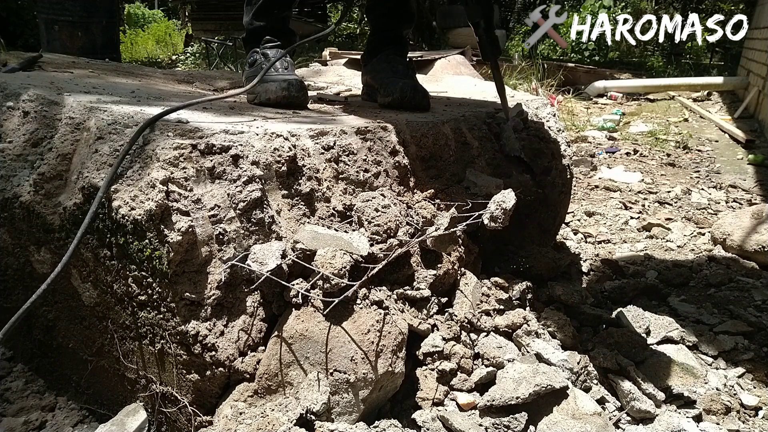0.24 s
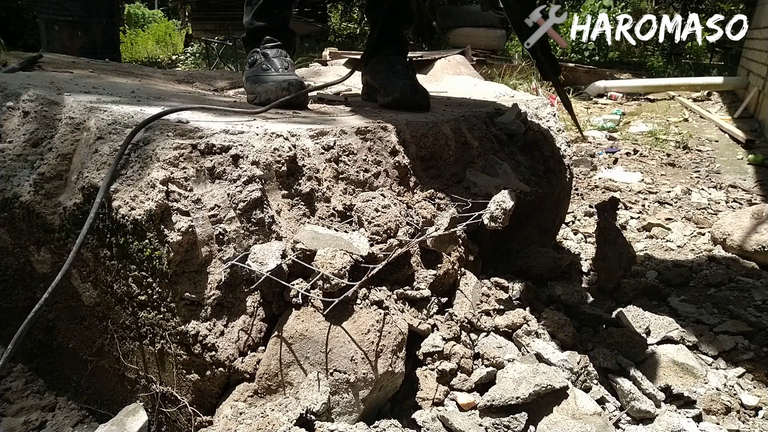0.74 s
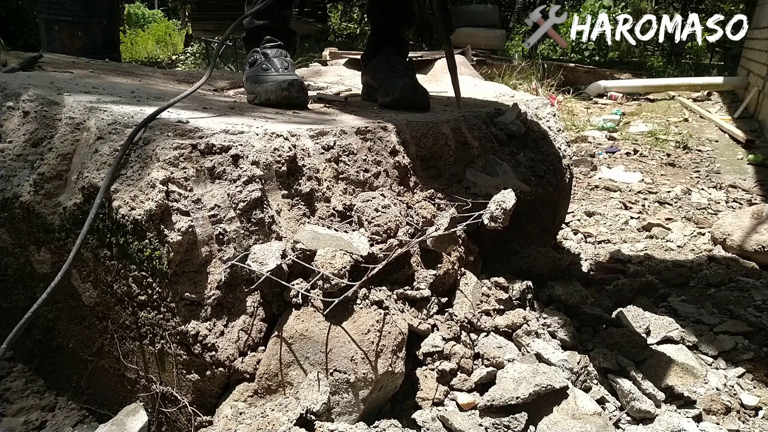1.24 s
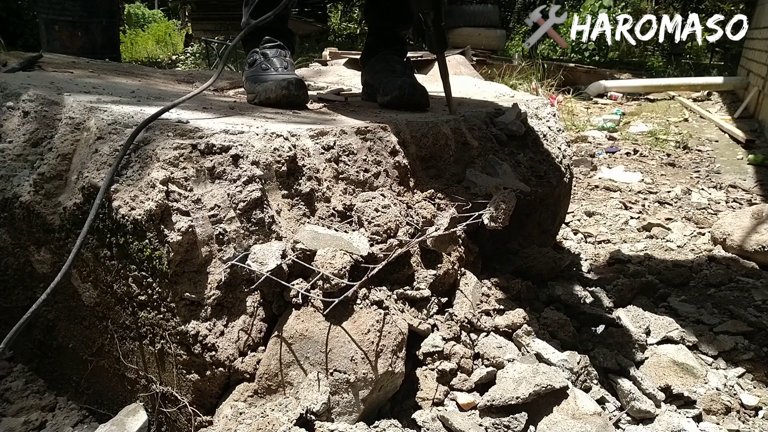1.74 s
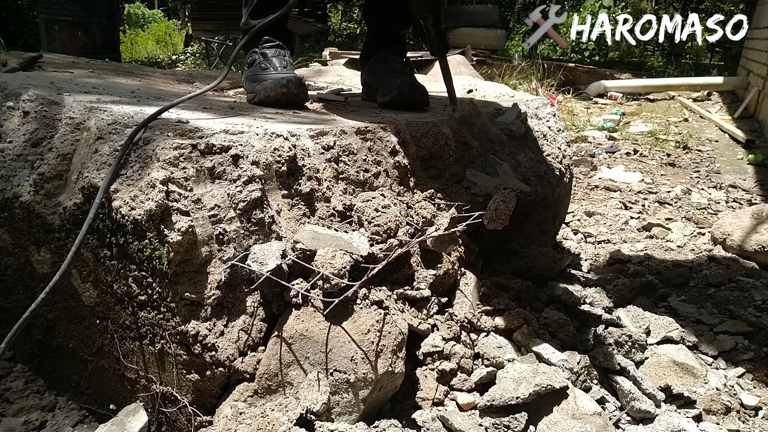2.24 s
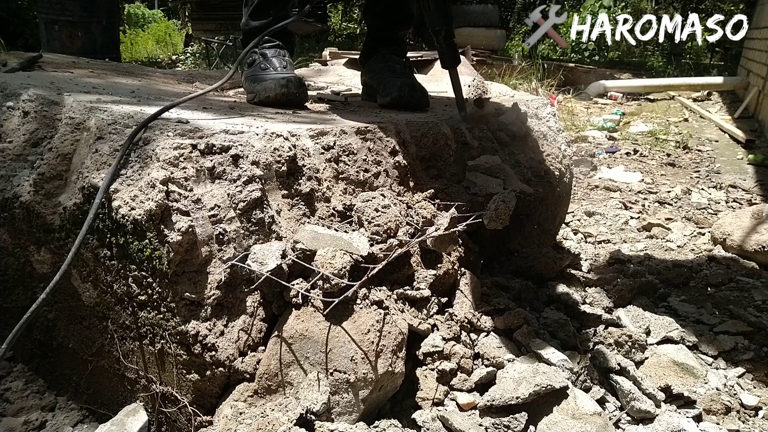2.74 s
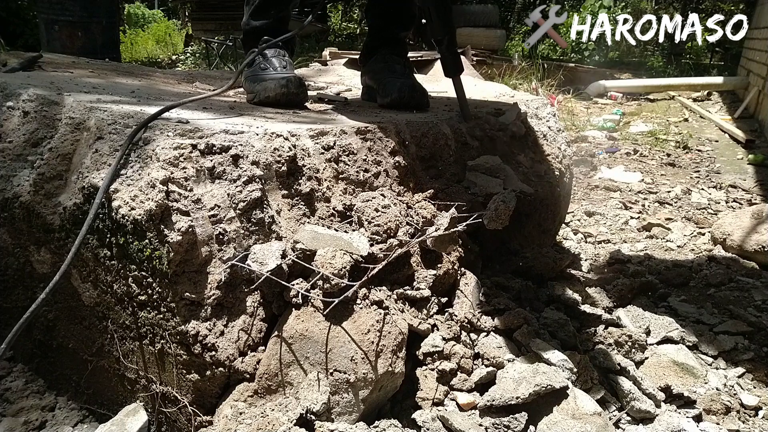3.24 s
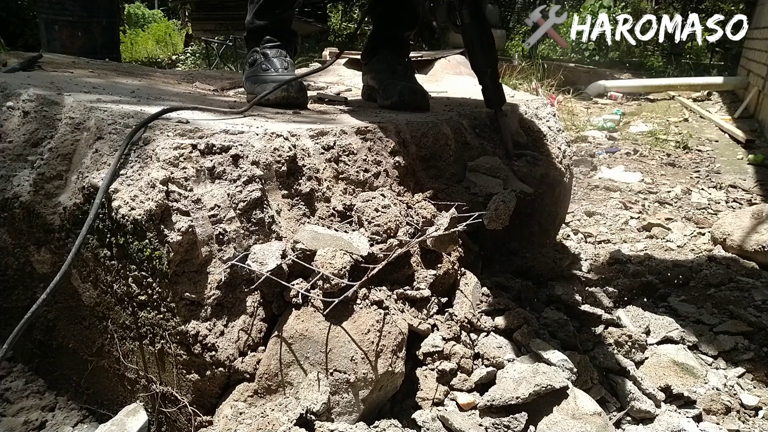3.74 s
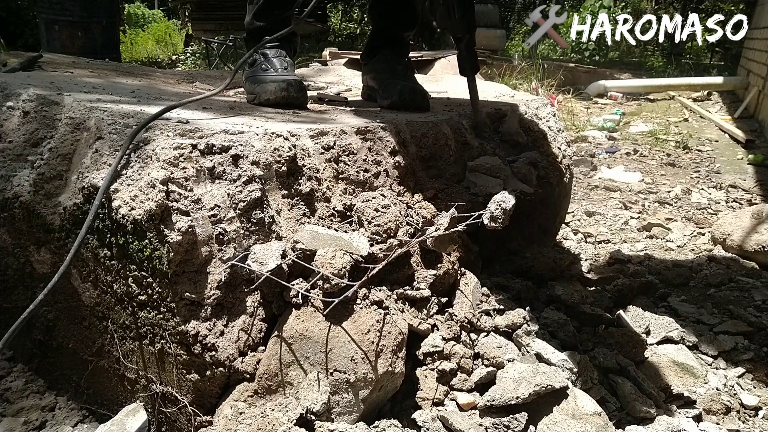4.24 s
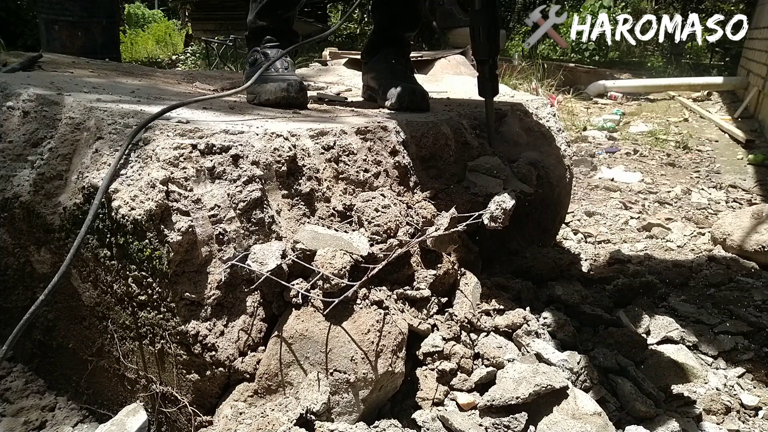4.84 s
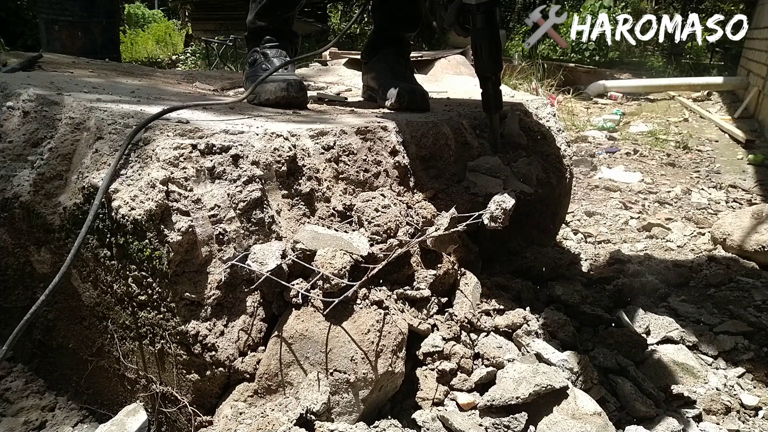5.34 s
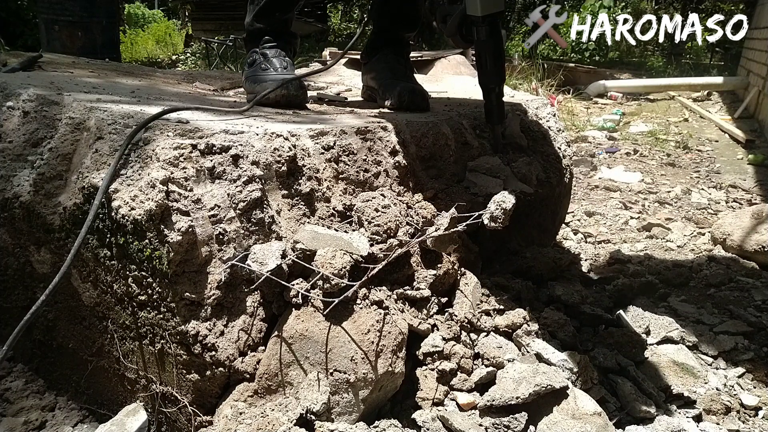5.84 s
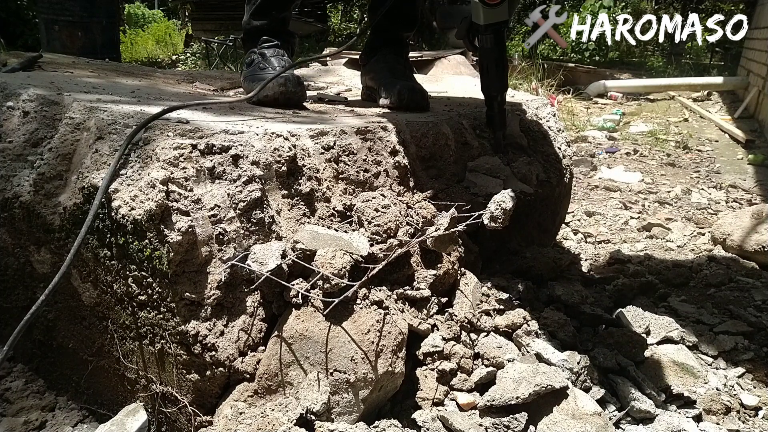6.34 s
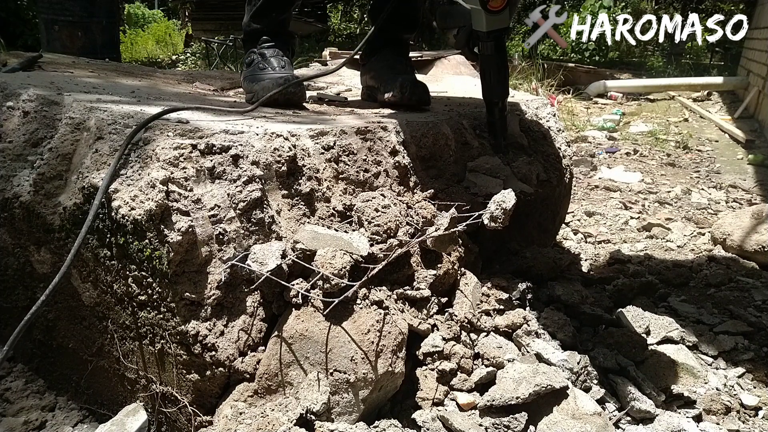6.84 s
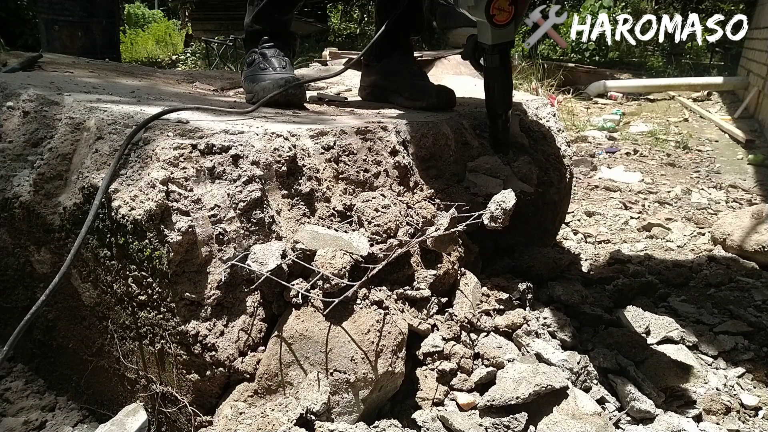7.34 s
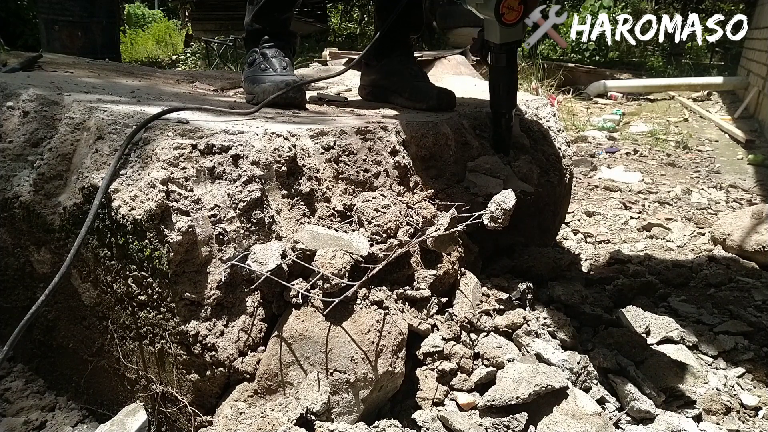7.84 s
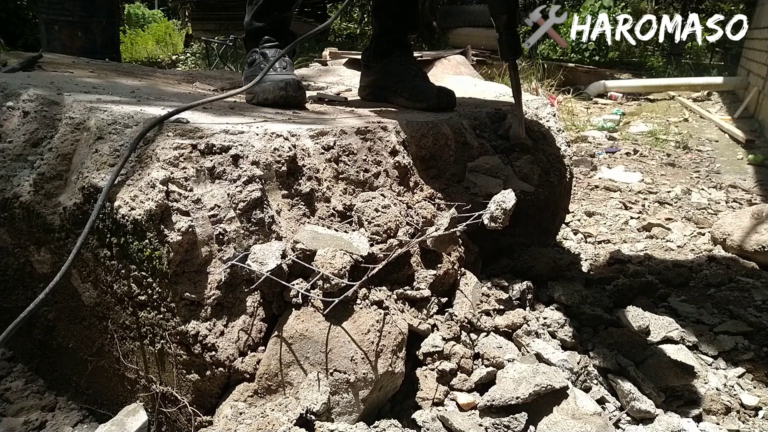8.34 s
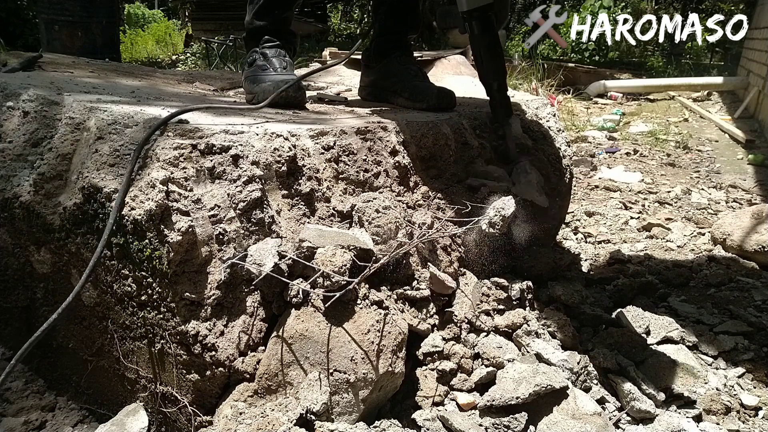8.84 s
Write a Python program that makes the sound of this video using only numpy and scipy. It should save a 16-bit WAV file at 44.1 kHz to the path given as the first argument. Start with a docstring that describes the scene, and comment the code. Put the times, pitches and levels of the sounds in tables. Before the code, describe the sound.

A power chisel hammers a concrete slab in two fast bursts, with gritty cracking and metallic ringing, its motor whining and rattling in between.

```python
"""An electric demolition hammer works on a concrete slab in a yard, a few metres away.
At first it runs free at 65 blows a second: the fan rushes and whines, loose parts rattle. Pressed down
at 1.6 s, it slows to 50; the chisel cracks and rings, the slab thuds, and dull thumps come and go. It is
lifted at 3.8 s and pressed again at 4.5 s; the tip wedges deep, its ring is damped and the gears groan
on each compression stroke. Pulled free at 7.9 s, it speeds up and touches the slab once more."""
import sys
import numpy as np
from scipy import signal
from scipy.fft import rfft, irfft, next_fast_len
from scipy.io import wavfile
from scipy.ndimage import uniform_filter1d, minimum_filter1d, map_coordinates

SR = 44100
rng = np.random.default_rng(int(sys.argv[2]) if len(sys.argv) > 2 else 0)


def store_pcm(level_fs):
    """Save levels as 16-bit WAV."""
    pcm = np.round(np.clip(level_fs, -1, 1) * 32767).astype(np.int16)
    wavfile.write(sys.argv[1], SR, np.atleast_2d(pcm).T)


N = 400428

# short, dull low thumps, mostly on one side: start_s, level_db, left_minus_right_db
THUMPS = [(1.735, -22, 6), (1.844, -22, 6), (2.035, -19, 6), (2.053, -15, 0), (2.074, -21, 4),
          (2.224, -22, 6), (2.304, -20, 6), (2.544, -21, 9), (2.562, -11.5, 7), (2.692, -18, 6),
          (4.565, -22, 0), (4.73, -22, 3), (4.746, -22, 3), (4.834, -17, 6), (4.853, -18, 1),
          (4.885, -22, 8), (6.73, -22, -8), (6.761, -24, -12), (6.821, -24, -12), (6.943, -21, -12),
          (6.962, -25, -15), (7.022, -23, -15), (7.041, -20, -13), (8.826, -22, 4), (8.856, -19, 6)]


def amp(db):
    """The decibel law: 20 dB is a tenfold amplitude."""
    return 10 ** (np.asarray(db) / 20)


def unit(x):
    """Normalisation to an rms of 1."""
    return x / np.sqrt(np.mean(x ** 2) + 1e-20)


def panned(pan_db):
    """Level panning: left and right gains that differ by pan_db."""
    return amp(np.array([[.5], [-.5]]) * pan_db)


def along(points, hz):
    """Interpolation of (frequency_hz, value) points on a logarithmic frequency axis."""
    f, v = np.transpose(points)
    return np.interp(np.log(hz + 1), np.log(f + 1), v)


def curves(rows):
    """Linear interpolation in time: one value per sample for each column after time_s."""
    s, *cols = np.transpose(rows)
    return [np.interp(np.arange(N) / SR, s, c) for c in cols]


def wobble(rate):
    """Smooth random modulation: a spline through rate Gaussian knots a second."""
    return map_coordinates(rng.standard_normal(int(N * rate / SR) + 4), [np.arange(N) * rate / SR])


def swell(centre_s, half_length_s):
    """A Gaussian envelope."""
    return np.exp(-((np.arange(N) / SR - centre_s) / half_length_s) ** 2)


def held(start_s, attack_s, end_s, release_s):
    """An envelope with linear attack, sustain at 1 and exponential decay."""
    t = np.arange(N) / SR
    return np.clip((t - start_s) / attack_s, 0, 1) * np.exp(-np.maximum(t - end_s, 0) / release_s)


def filtered(x, response):
    """Linear filtering: the spectrum of x times a complex frequency response."""
    m = next_fast_len(N + SR // 2)
    return irfft(rfft(x, m) * response(np.fft.rfftfreq(m, 1 / SR)), m)[..., :N]


def coloured(x, spectrum):
    """Spectral shaping of x by a smooth envelope, at rms 1."""
    return unit(filtered(x, lambda hz: amp(along(spectrum, hz))))


def rung(x, modes):
    """Modal superposition: x drives damped resonators in parallel; the sum has rms 1."""
    def response(f):
        return sum(amp(db) * 1j * f * width / (pitch * pitch - f * f + 1j * f * width)
                   for pitch, width, db in modes)
    return unit(filtered(x, response))


def shifted(x, hz):
    """Single-sideband modulation moves all partials of x by the same curve in Hz."""
    analytic = signal.hilbert(x, next_fast_len(N))[:, :N]
    return (analytic * np.exp(2j * np.pi * np.cumsum(hz) / SR)).real


def noise(alike=1):
    """Partly coherent white noise at two microphone ports; alike scales their correlation."""
    # likeness of left and right: frequency_hz, correlation
    likeness = [(50, 0), (150, 1), (300, 0.7), (1000, 0.22), (2500, 0.35), (5000, 0.08), (11000, -0.018)]

    def mid_side_gains(hz):
        angle = np.arccos(np.clip(alike * along(likeness, hz), -1, 1)) / 2
        return np.array([np.cos(angle), np.sin(angle)])
    mid, side = filtered(rng.standard_normal((2, N)), mid_side_gains)
    return np.array([mid + side, mid - side])


def buzz(turns, repeat_db, alike=1):
    """Periodicity gives pitch: part of this noise repeats on every crank turn."""
    size = 840
    phases = rng.uniform(0, 2 * np.pi, size // 2) + 1.33 * rng.standard_normal((2, size // 2))
    cycles = unit(irfft(np.exp(1j * phases), size))  # equally strong harmonics
    periodic = np.array([map_coordinates(port, [turns % 1 * size], mode="grid-wrap") for port in cycles])
    return unit(noise(alike) + amp(repeat_db) * periodic)


def strokes(turns, lead, rise, fall, scatter_db):
    """A pulse train: one burst of random strength per crank turn; lead, rise and fall are in turns."""
    count, age = np.divmod(turns + lead + 1, 1)
    strength = amp(scatter_db * rng.standard_normal(1024))[count.astype(int)]
    return unit(strength * (1 - np.exp(-age / rise)) * np.exp(-age / fall) * (1 - age ** 4))


def clatter(x, depth_db):
    """Shifting contacts: loose parts touch in ever new places, so narrow bands swell and fade."""
    bands = signal.stft(x, nperseg=1024)[2]
    field = uniform_filter1d(rng.standard_normal(bands.shape[1:]), size=4, axis=0)
    field = unit(uniform_filter1d(field, size=5, axis=1))
    return unit(signal.istft(bands * amp(depth_db * field), nperseg=1024)[1][:, :N])


def handling():
    """Coupling of tip and slab: how firmly it touches and how deeply it is wedged, both 0-1."""
    # the tip is pressed on the slab: start_s, lifted_s
    presses = [(1.622, 3.82), (4.47, 7.91), (8.74, 8.87)]
    # the tip sinks in and wedges: start_s, sink_s, freed_s, depth (0-1)
    jams = [(2.85, 0.18, 3.36, 0.5), (4.78, 1, 7.92, 0.89)]
    seat_s, lift_s, unjam_s = 0.03, 0.032, 0.078
    graze = 0.13  # contact left while the tool hangs free
    pressed = sum(held(start, seat_s, end, lift_s) for start, end in presses)
    wedged = sum(depth * held(start, sink, end, unjam_s) for start, sink, end, depth in jams)
    return np.clip([graze + (1 - graze) * pressed, wedged], 0, 1)


def gear_tones(turns):
    """Rotational orders: armature and gears sound at fixed multiples of the crank speed."""
    # armature and gear tones: cycles_per_turn
    orders = [5.86, 7, 19, 40, 42, 44]
    # their relative strengths: level_db
    levels = [-21.5, -23, -22, -10.5, -15, -6]
    tones = np.zeros((2, N))
    for order, db in zip(orders, levels):
        drift = .8 * np.array([wobble(14), wobble(14)]) + .7 * wobble(60)
        tones += amp(db - 4 + 2.2 * wobble(14)) * np.sin(2 * np.pi * order * turns + drift)
    return tones


def fan_whine(turns, free, wedged):
    """The fan's tone is a high order of the crank speed, modulated at random in phase and level."""
    # whine while the tip is free: time_s, level_db
    whine_levels = [(0, -5), (.1, -1.5), (.16, -5), (.3, -5), (.4, -1), (.5, -11), (.68, -12), (.85, -7),
                    (.97, -3), (1.05, -13), (1.15, -3.5), (1.26, -8), (1.35, -2.5), (1.6, -2), (3.9, -18),
                    (4.07, -13), (4.14, -5), (4.48, -10), (8.0, -11), (8.08, -1), (8.45, -5), (8.54, -10),
                    (8.68, -5), (8.91, 4), (9.08, -8)]
    fan_order = 70.4
    drift = 0.5 * np.array([wobble(25), wobble(25)]) + .55 * wobble(110)
    flicker = amp(2 * wobble(60))
    level = amp(curves(whine_levels)[0]) * free ** 1.14 + amp(-11.5) * wedged
    return level * flicker * np.sin(2 * np.pi * fan_order * turns + drift)


def motor(turns, contact, wedged, load):
    """Broadband fan noise surges with the loaded crank; rattles excite resonances while the tip is free."""
    # rush of the fan's air: frequency_hz, density_db
    air_spectrum = [(30, -20.5), (230, -34), (300, -16.5), (390, -9.5), (750, -9.5), (1150, -4.5),
                    (2000, 1), (3500, 1), (4700, -0.5), (6200, -1.5), (8500, 2), (11000, 1), (11800, 0),
                    (16000, -7.5)]
    # the chisel loose in its holder: pitch_hz, width_hz, level_db
    loose_modes = [(469, 18, -3), (2630, 32, -9), (2860, 30, -7), (6640, 77, 4), (10600, 92, -1.5),
                   (10430, 130, 10.5)]
    # resonance of the casing: pitch_hz, width_hz, level_db
    casing_modes = [(1170, 270, 0)]
    # rattle of the casing: time_s, level_db
    casing_levels = [(0, -11), (.28, -21), (.45, -7.5), (.7, -13), (.9, -26), (1.15, -12.5), (1.58, -8.5),
                     (3.9, -14.5), (4.35, -14), (8, -15), (9.08, -23)]
    level_db = -19 - 6.5 * contact + 5 * wedged ** 2 * contact + 1.5 * load * (0.5 - contact)
    level = amp(level_db + 0.33 * wobble(12))
    free = (1 - contact) ** 2
    rattle = amp(0.55 * wobble(260) + 0.56 * wobble(30))
    surge_db = 0.74 * load * np.cos(2 * np.pi * (turns + .11))  # peaks just before the blow
    air = coloured(buzz(turns, repeat_db=-9, alike=1.52) * rattle, air_spectrum)
    air = amp(4.5 - 0.76 * wedged + surge_db) * clatter(air, depth_db=2.5)
    jingle = amp(-4.5) * clatter(rung(noise(alike=2.3) * rattle, loose_modes), depth_db=3.5)
    casing = rung(buzz(turns, repeat_db=-2.5, alike=1.9) * rattle, casing_modes)
    casing *= amp(curves(casing_levels)[0])
    mechanism = gear_tones(turns) + jingle + casing
    return level * (air + fan_whine(turns, free, wedged) + free * mechanism)


def gear_strain(turns, wedged):
    """Cyclic loading: the gears knock, groan and grind each time the piston compresses the air."""
    # load on the gears: time_s, level_db, groan_cycles_per_turn
    strain = [(3.2, -4.5, 39.8), (4.9, 2.5, 39.5), (5.15, 1, 40), (5.35, 0.5, 40.7), (6.35, 0.5, 41),
              (6.7, -2, 41.2), (7.4, -3, 41.6), (7.57, 2, 41.7), (7.72, -2, 41.7), (7.86, -1, 41.4),
              (7.98, -8, 38.5)]
    # grinding teeth: pitch_hz, width_hz, level_db
    tooth_modes = [(1880, 170, 4), (2200, 160, -3), (2770, 140, -1.5), (3730, 130, 1), (4200, 75, 4.5),
                   (5150, 120, -13)]
    # gear case, knocked as the load is taken up: pitch_hz, width_hz, level_db
    case_modes = [(259, 19, -5), (323, 42, -2), (677, 67, -0.5), (997, 84, -2)]
    lead_turns, half_length_turns = .13, 0.12  # the compression peak, ahead of the blow
    strain_db, mesh_order = curves(strain)
    stroke = (turns + lead_turns + .5) % 1 - .5
    squeeze = unit(np.exp(-(stroke / half_length_turns) ** 2) * amp(1.3 * wobble(50)))
    # the groan starts afresh on every stroke, never at quite the same pitch
    mesh_phase = 2 * np.pi * (mesh_order + .15 * wobble(30)) * stroke
    mesh_phase = mesh_phase + .3 * np.array([wobble(100), wobble(100)])
    groan = unit(squeeze * (np.sin(mesh_phase) + 0.42 * np.sin(2 * mesh_phase)))
    grind = rung(buzz(turns, repeat_db=3, alike=.6) * squeeze ** 0.67, tooth_modes)
    teeth = amp(-26) * wedged ** 0.69 * groan + amp(-29) * wedged ** 0.54 * grind
    take_up = strokes(turns + .011 * wobble(40), lead=.34, rise=.004, fall=.005, scatter_db=2)
    growl = amp(-40.5 + 1.5 * wobble(6)) * wedged ** 2 * rung(take_up, case_modes)
    return amp(strain_db) * teeth + growl


def housing_knock(turns, contact, wedged):
    """Reaction force: the recoil of each blow excites the modes of the housing."""
    # housing under load: pitch_hz, width_hz, level_db
    modes = [(317, 61, -4.5), (475, 41, -5), (694, 70, -2), (900, 26, -12), (1130, 170, 6), (1420, 170, -1)]
    recoil = strokes(turns, lead=0.042, rise=0.072, fall=0.081, scatter_db=0.5)
    jolt = strokes(turns + .005 * wobble(40), lead=.02, rise=.004, fall=.005, scatter_db=1.8)
    knock = amp(-35) * rung(buzz(turns, repeat_db=-2) * recoil, modes) + amp(-34) * rung(jolt, modes)
    return (0.65 * wedged ** 2 + 0.16 * contact) * knock


def metallic_tones(turns):
    """Narrow-band noise pulsed by the crank: brief, rough metallic tones, running free or pressed."""
    # tones, mostly near 2.5 kHz: centre_s, half_length_s, pitch_hz, level_db
    tones = [(.2, 0.065, 2550, -30), (0.561, .018, 1990, -24), (0.666, 0.025, 2710, -21.5),
             (.65, .05, 2860, -27.5), (1.632, 0.039, 2880, -27), (1.817, 0.085, 2570, -29.5),
             (3.74, .04, 3800, -25.5), (3.74, 0.037, 2490, -28), (4.27, 0.15, 2565, -28),
             (4.7, 0.081, 2490, -28), (7.572, 0.052, 2460, -29), (8.14, 0.079, 2540, -26.5),
             (8.432, .05, 2540, -31), (8.935, .02, 2000, -28)]
    t = np.arange(N) / SR
    pulses = strokes(turns, lead=0.095, rise=0.062, fall=0.45, scatter_db=2)
    in_phase, quadrature = wobble(260), wobble(260)
    ring = np.zeros(N)
    for centre_s, half_length_s, hz, db in tones:
        rough_band = in_phase * np.cos(2 * np.pi * hz * t) + quadrature * np.sin(2 * np.pi * hz * t)
        ring += amp(db) * swell(centre_s, half_length_s) * rough_band
    return pulses * ring


def thumps():
    """Transients: each short, dull thump is one pressure pulse with a brief, decaying puff of noise."""
    # the puff: frequency_hz, density_db
    puff_spectrum = [(25, 0), (80, 3), (260, -18), (600, -2), (2000, -21), (9000, -21)]
    pulse_s, puff_t60_s = 0.00075, 0.044
    out = np.zeros((2, N + SR))
    t = np.arange(SR // 8) / SR
    age = t / pulse_s
    pulse = age * (2 - age) * np.exp(-age)
    decay = amp(-12 - 60 * t / puff_t60_s)
    puff_noise = coloured(noise(alike=0.11), puff_spectrum)
    for start_s, db, pan_db in THUMPS:
        i = round(start_s * SR)
        puff = decay * puff_noise.take(i + np.arange(len(t)), axis=1, mode="wrap")
        out[:, i:i + len(t)] += amp(db) * panned(pan_db) * (pulse + puff)
    return out[:, :N]


def thud_level(contact, wedged, load):
    """Energy transfer to the slab grows with load and drops as the tip slips or wedges."""
    # the tip slips: centre_s, half_length_s, change_db
    slips = [(1.96, .03, -7), (2.15, .04, -9), (2.4, .05, -9), (3.78, .08, -7)]
    slip_db = sum(db * swell(s, length) for s, length, db in slips)
    level_db = -56.5 + contact * (6 + 13.5 * load) - 21 * wedged ** 3 + slip_db
    # the low rumble also swells around each thump
    swell_power = sum((amp(db - 24) * panned(pan_db)) ** 2 * swell(s, half_length_s=0.04)
                      for s, db, pan_db in THUMPS)
    return np.sqrt(amp(level_db) ** 2 + swell_power)


def slab(turns, contact, wedged, load):
    """Forced vibration: every blow pushes the slab down once, and loosened concrete shudders with it."""
    # shudder and thud of the slab: frequency_hz, density_db
    shudder_spectrum = [(20, -23), (50, -4), (100, -3), (250, -2.5), (500, -6), (1200, -38), (4000, -80)]
    thud_spectrum = [(20, -9), (50, -0.5), (100, -1.5), (180, -5), (280, 5), (700, -12), (3000, -48)]
    push = strokes(turns, lead=0.099, rise=0.041, fall=0.074, scatter_db=1.5)
    thud = amp(-3.5) * contact * coloured(np.mean(push) - push, thud_spectrum)
    shudder = coloured(noise(alike=0.15) * (push + 1), shudder_spectrum)
    return thud_level(contact, wedged, load) * (thud + amp(-1.5 - 3.7 * np.sqrt(wedged)) * shudder)


def tip_bounce(turns, contact, wedged):
    """Rebound: until it is wedged, the tip dances on the stone with an uneven, scraping rattle."""
    # stone and steel knocking together: pitch_hz, width_hz, level_db
    stone_modes = [(976, 190, -4), (2030, 170, 1.5), (2470, 110, -0.5), (3760, 260, -3), (5000, 300, -3)]
    bounces = strokes(turns + .05 * wobble(40), lead=.1, rise=.03, fall=.1, scatter_db=2.5)
    return amp(-32.5) * contact * (1 - wedged) * rung(noise(alike=0.5) * bounces, stone_modes)


def chisel_ring(turns, blows, scrape, contact, wedged, load):
    """Modal ringing and damping: struck steel rings long while free, briefly in the slab's grip."""
    # modes of the free shank: pitch_hz, width_hz, level_db
    shank_modes = [(2400, 99, -24), (7770, 54, -22), (10780, 71, -6), (10890, 59, 7.5), (11200, 200, -2)]
    # modes of the tip: pitch_hz, width_hz, level_db
    tip_modes = [(11740, 51, 9.5), (11840, 100, -1)]
    # modes of the wedged chisel: pitch_hz, width_hz, level_db
    wedged_modes = [(11815, 450, 4), (11360, 520, -6)]
    # a gripped tip stiffens the bar and raises its modes: time_s, shank_shift_hz
    stiffening = [(1.5, 0), (1.72, -90.5), (2.35, 60), (2.7, 40), (3.05, 200.5), (3.33, 209), (3.52, -110),
                  (3.8, 0.5), (4.55, 29.5), (4.82, -40.5), (5.1, 210), (5.6, 550.5), (7.9, 551.5),
                  (8.05, 0.5)]
    # harder or softer stone makes the ring flare or drop: centre_s, half_length_s, tip_db, shank_db
    flares = [(.17, .03, -4, 8), (0.598, 0.039, 20, 7), (.69, .05, 7, -8), (1.695, 0.025, 2, -2),
              (1.908, 0.024, 4, 6), (2.07, 0.045, 4, 2), (2.428, 0.015, -4, -10), (2.546, 0.092, 3, 0),
              (3.085, 0.18, 1, 8.5), (3.425, 0.039, 2, 2), (3.593, 0.088, 4, 5), (4.595, 0.072, 6, 1),
              (4.828, 0.055, 1.5, 9), (5.08, 0.088, 2, 3), (5.25, 0.34, 5, -9), (8.668, 0.036, 21, 7),
              (8.848, 0.034, 4, 2)]
    drive = strokes(turns, lead=.16, rise=.08, fall=.35, scatter_db=1.5) + .45
    shift_hz = curves(stiffening)[0] + 35 * wobble(16)
    shank = shifted(rung(buzz(turns, repeat_db=-5.5, alike=.5) * drive, shank_modes), shift_hz)
    tip = shifted(rung(buzz(turns, repeat_db=-7, alike=1.1) * drive, tip_modes), 0.27 * shift_hz)
    damped = rung(buzz(turns, repeat_db=-6) * (blows + .7 * scrape + 0.15), wedged_modes)
    tip_db, shank_db = sum(np.outer(gains_db, swell(s, length)) for s, length, *gains_db in flares)
    free = amp(shank_db - 1) * shank + amp(tip_db + 1) * (0.27 + 0.65 * contact) * tip
    grip = wedged ** 0.55  # share of the ring that the slab cuts short
    ring = np.sqrt(1 - grip) * free + amp(3.5 + .5 * tip_db) * np.sqrt(grip) * damped
    # loudest on bare stone; lifted with the crank still slow, the steel is barely struck
    level_db = -26 + 7.5 * contact - 9 * wedged - 13 * load * (1 - contact)
    waver_db = 1.5 * wobble(16)  # from one spot of stone to the next
    return amp(level_db + waver_db) * ring


def chisel(turns, contact, wedged, load):
    """Impact excitation: each blow crushes grit, rings the steel and, once wedged, cracks sharply."""
    # crack of the striker on the wedged chisel: frequency_hz, density_db
    crack_spectrum = [(200, -28), (800, -19.5), (1150, -3), (1600, -3.5), (2200, 4), (3200, -5), (4200, 3),
                      (5600, -19), (7300, 8), (12000, 5), (16000, -14)]
    # grit crushed under the tip: frequency_hz, density_db
    grit_spectrum = [(100, -10), (400, -4.5), (900, -13), (2000, -34), (4000, -6), (5700, -3), (7500, 5.5),
                     (10000, 7), (12000, -0.5), (16000, -30)]
    blows = strokes(turns, lead=.08, rise=.07, fall=.1, scatter_db=1.2)
    scrape = strokes(turns, lead=.3, rise=.25, fall=.2, scatter_db=1.2)
    strike = strokes(turns, lead=.055, rise=.012, fall=.055, scatter_db=1.4)
    crack = amp(-24.5) * wedged * coloured(buzz(turns, repeat_db=-1) * strike, crack_spectrum)
    grit = coloured(buzz(turns, repeat_db=-4, alike=0.91) * (blows + scrape + 1.5), grit_spectrum)
    grit = amp(-22.5 - 2 * wedged) * contact * clatter(grit, depth_db=4.5)
    return crack + grit + chisel_ring(turns, blows, scrape, contact, wedged, load)


def scene():
    """Superposition: one crank, slowing under load, times the tool; sound reaches the right port first."""
    # crank speed, one blow a turn: time_s, speed_hz
    crank_speed = [(0, 62.5), (.3, 64.3), (.45, 64.8), (.62, 64.2), (.8, 64.95), (.96, 65.25),
                   (1.61, 65.22), (2.38, 55.76), (2.54, 56.47), (2.8, 51.96), (3.17, 49.93), (3.63, 50.41),
                   (3.98, 59.79), (4.23, 63.17), (4.57, 64.31), (5.03, 51.38), (5.5, 49.93), (6.9, 49.91),
                   (7.9, 50.17), (8.13, 59.6), (8.4, 63.5), (8.73, 64.89), (8.9, 63), (9.08, 64.4)]
    # arrival delay at the left port, set by where the tool is: time_s, lag_samples
    left_lag = [(0, 1.1), (1.7, 0.58), (3.5, 1.56), (4.8, 2.5), (5.7, 2.7), (7.8, 3.2), (9.08, 1.8)]
    free_hz, loaded_hz = 65, 50
    speed_hz = curves(crank_speed)[0]
    turns = np.cumsum(speed_hz) / SR
    load = np.clip((free_hz - speed_hz) / (free_hz - loaded_hz), 0, 1)
    contact, wedged = handling()
    tool = motor(turns, contact, wedged, load) + gear_strain(turns, wedged)
    tool += housing_knock(turns, contact, wedged) + chisel(turns, contact, wedged, load)
    tool += metallic_tones(turns) + tip_bounce(turns, contact, wedged)
    left, right = tool + slab(turns, contact, wedged, load) + thumps()
    left = map_coordinates(left, [np.arange(N) - curves(left_lag)[0]], order=5, mode="nearest")
    return np.array([left, right])


def limited(x, ceiling):
    """Peak limiting: one fast, smoothed gain turns both channels down around the highest peaks."""
    gain = np.minimum(1, ceiling / (np.abs(x).max(axis=0) + 1e-9))
    return x * uniform_filter1d(minimum_filter1d(gain, size=260), size=260)


def record(dry):
    """Filtering and limiting: left and right differ in colour, the top treble is cut, peaks are held."""
    # imbalance of the ports: frequency_hz, left_minus_right_db
    imbalance = [(50, 3.5), (150, 6), (300, 2.5), (1000, 1.5), (2000, .3), (5500, -.3), (7500, -2.8),
                 (9800, -2.3), (10800, .5), (11500, 2), (11950, 6.5), (12300, 4)]
    # steep treble cut above 12 kHz, with a faint hiss near 15 kHz: frequency_hz, gain_db
    treble_cut = [(12020, 2.5), (12200, -47), (12800, -41), (14400, -10), (15000, -8.5), (15800, -34)]
    cutoff_hz = 15983
    shaped = filtered(dry, lambda hz: panned(along(imbalance, hz)) * amp(along(treble_cut, hz)))
    return filtered(limited(shaped, ceiling=0.89), lambda hz: hz < cutoff_hz)


dry = scene()
out = record(dry)
store_pcm(out)
```